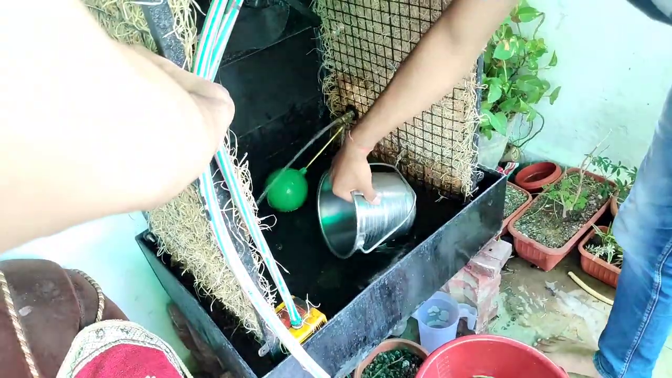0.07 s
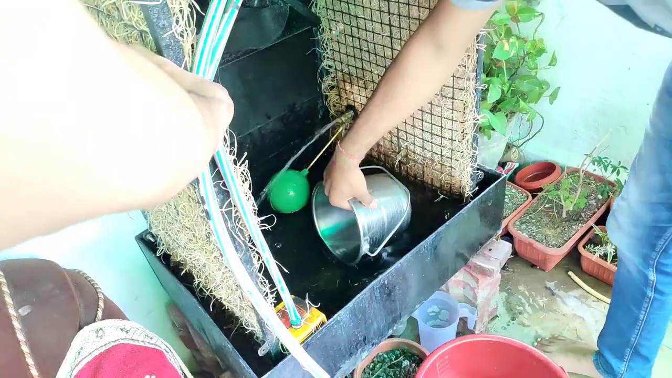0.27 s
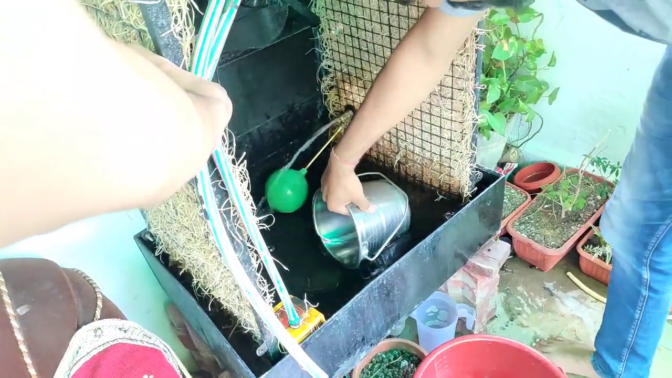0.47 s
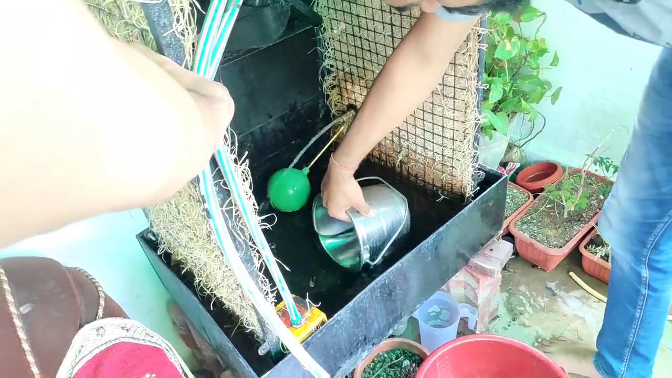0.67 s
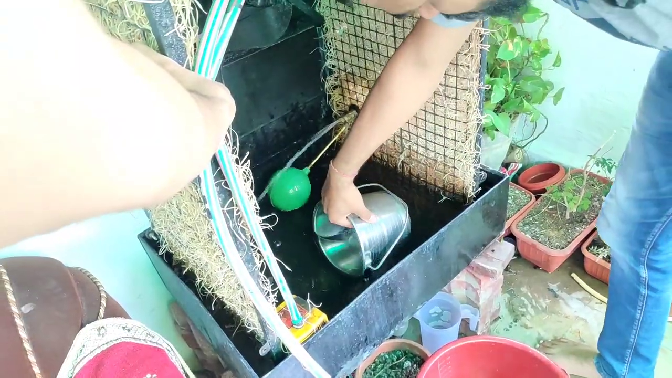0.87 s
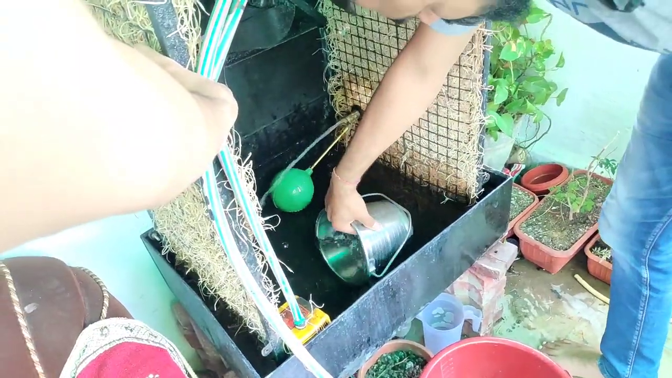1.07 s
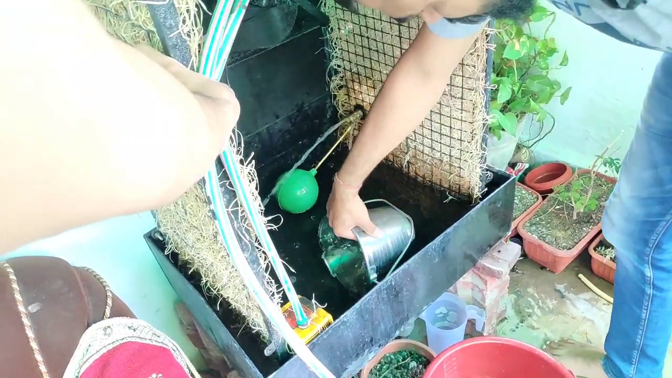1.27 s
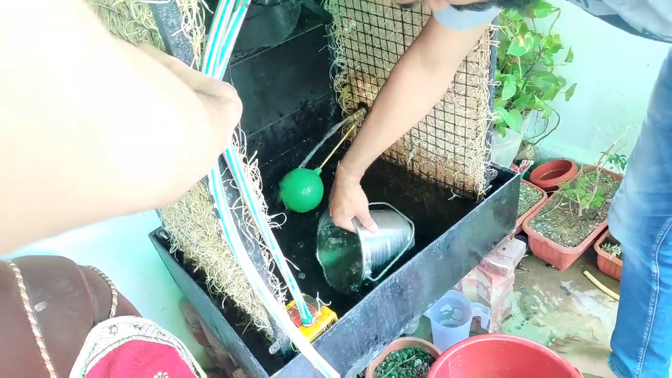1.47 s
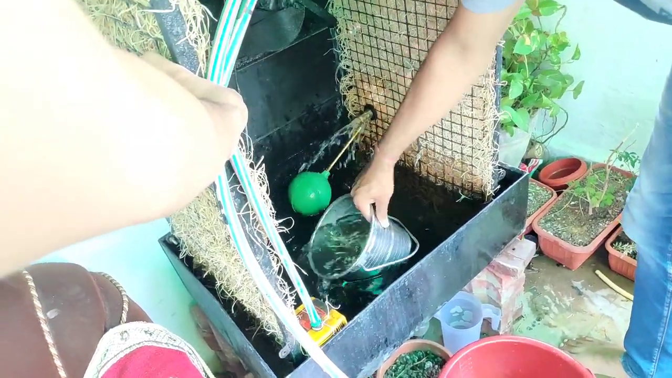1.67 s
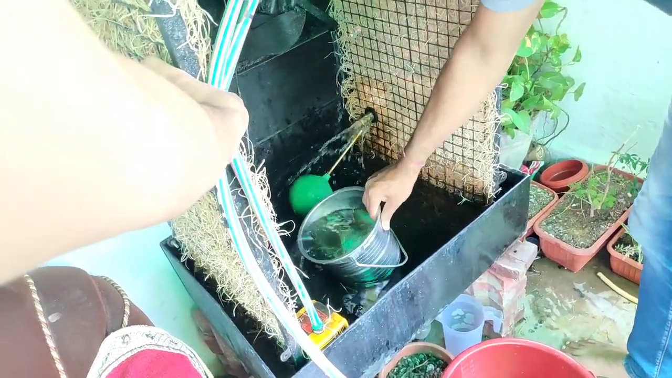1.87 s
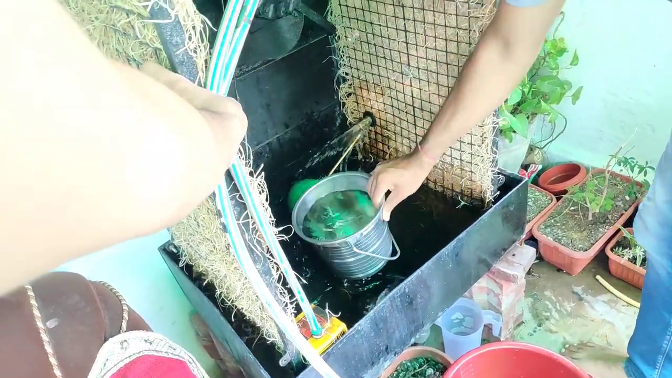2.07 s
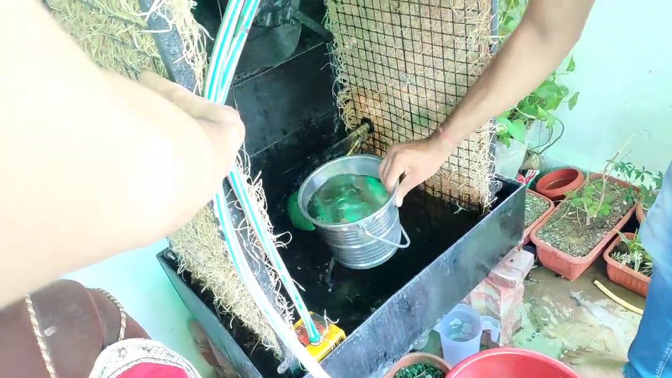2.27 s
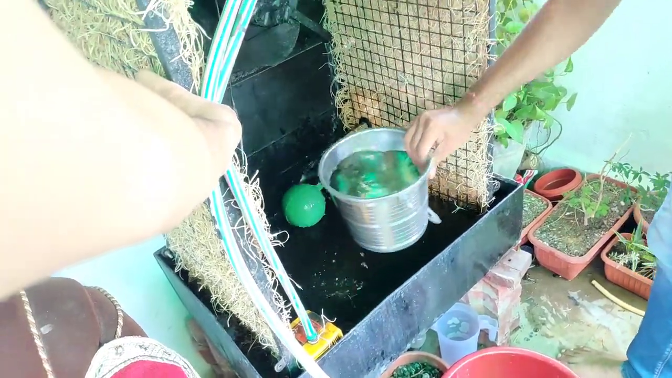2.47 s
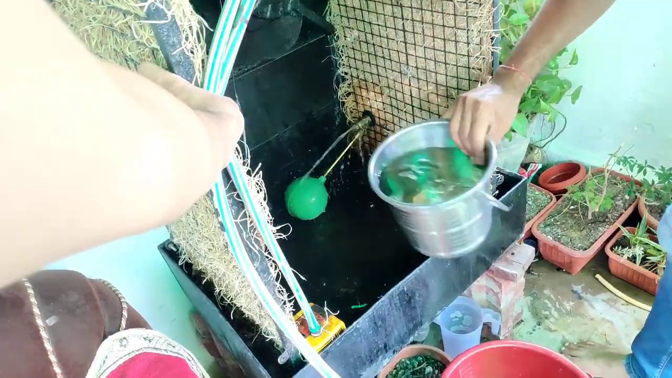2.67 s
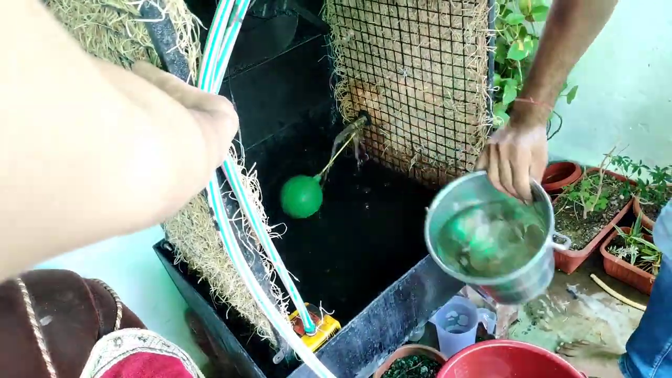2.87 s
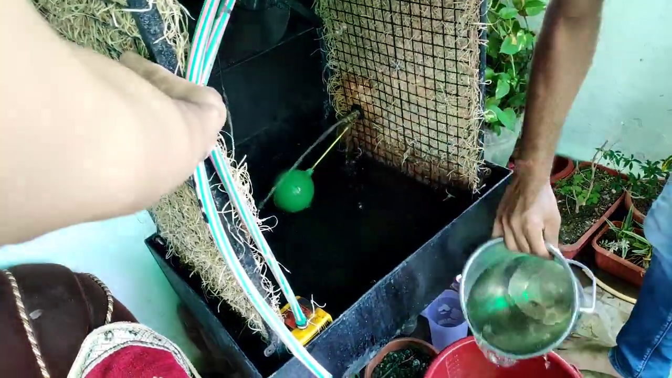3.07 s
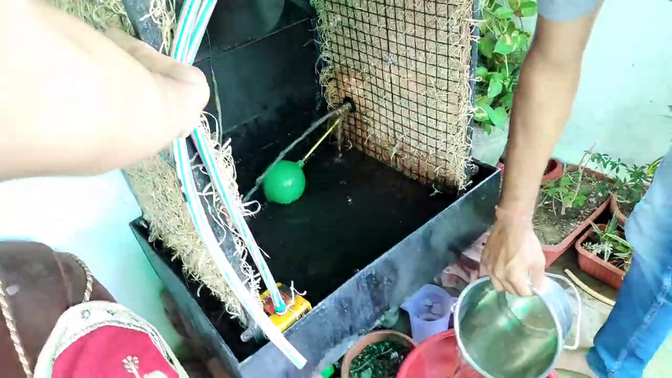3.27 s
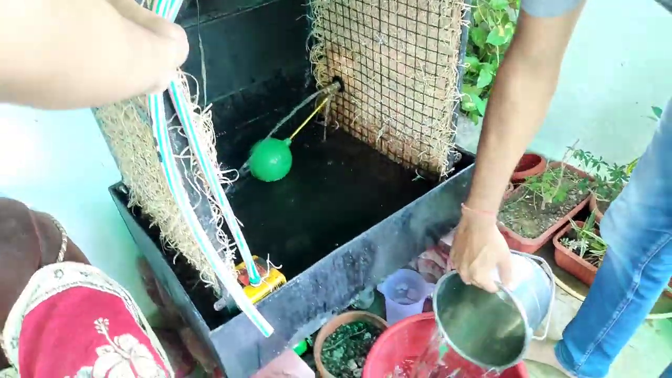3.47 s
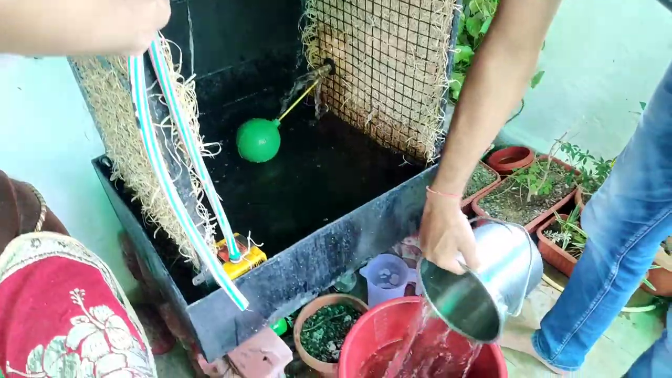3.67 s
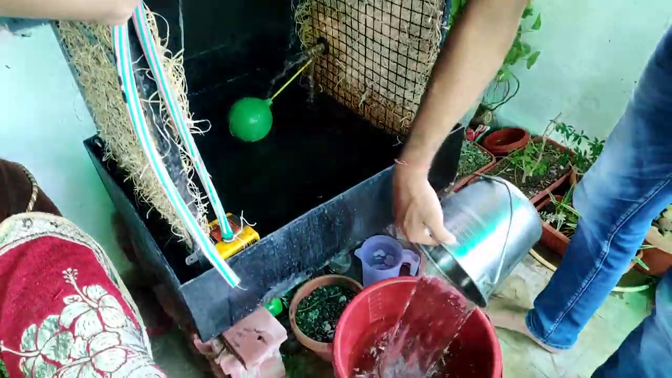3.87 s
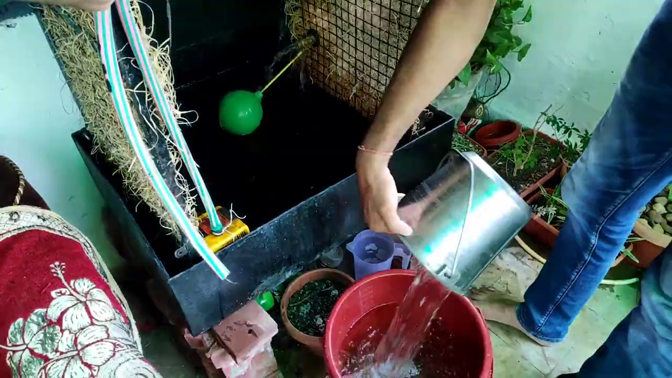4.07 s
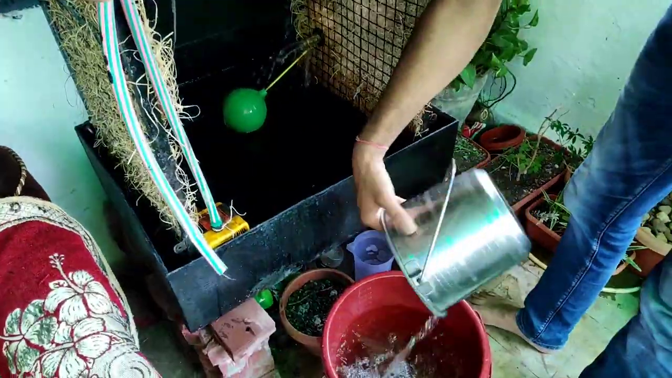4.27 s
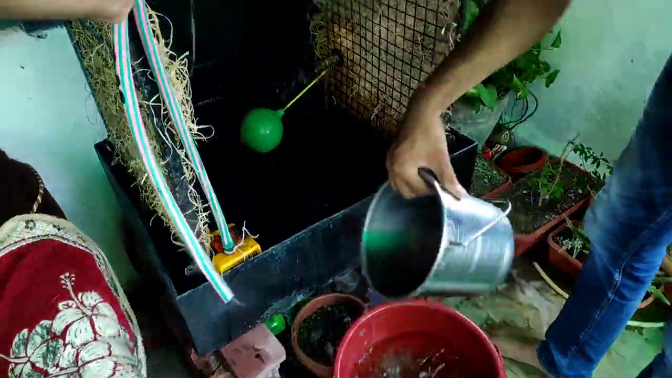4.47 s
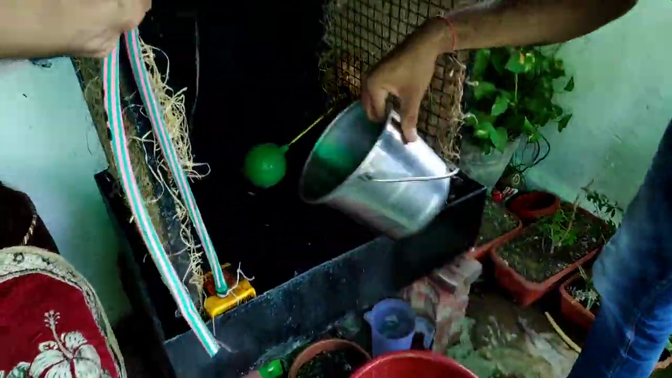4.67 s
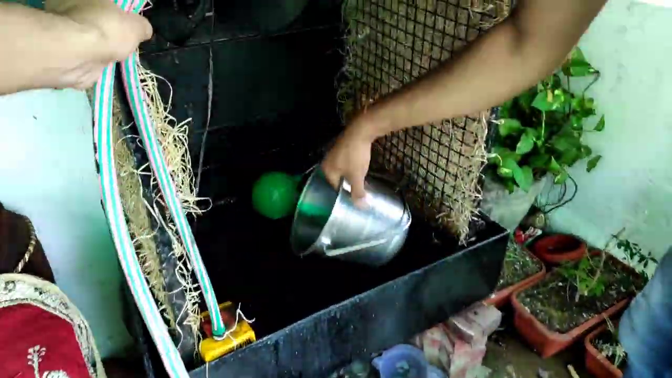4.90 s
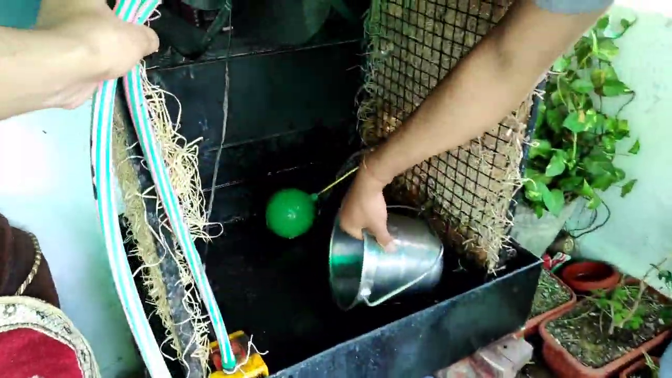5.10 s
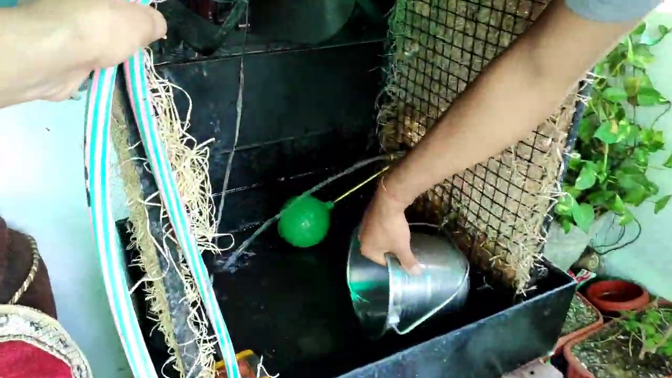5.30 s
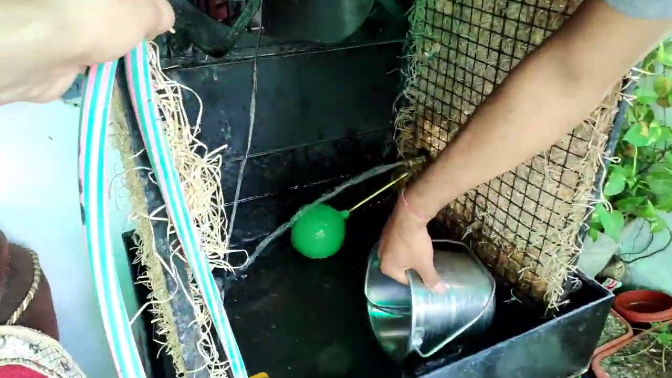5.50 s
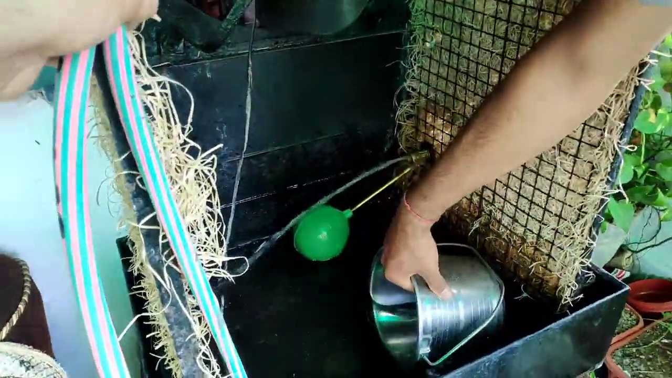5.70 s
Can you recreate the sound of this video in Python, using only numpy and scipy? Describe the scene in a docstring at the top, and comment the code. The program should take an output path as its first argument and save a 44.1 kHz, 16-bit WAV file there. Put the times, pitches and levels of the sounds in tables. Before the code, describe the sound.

A metal bucket scoops gurgling water from a tank, pours it splashing into a plastic tub, then knocks loudly with a ringing clang.

```python
"""A steel bucket is dipped into a water tank, fills, drips and is poured into a plastic tub; emptied,
it knocks and rings on its way back. Plops, drops and gurgles are ringing air bubbles; the pour is a
resonant rush full of bubbles; the steel is a sum of decaying modes; spray and trickle are shaped noise.
Water trickles in the tank all along, and its walls return short reflections.
A phone microphone with a noise suppressor listens from nearby and overloads on the knocks."""
import sys
import numpy as np
from scipy import signal
from scipy.io import wavfile
from scipy.ndimage import uniform_filter1d

SR = 44100
rng = np.random.default_rng(int(sys.argv[2]) if len(sys.argv) > 2 else 0)


def dump_mix(stems):
    """Bounce the given channels to the path in sys.argv[1] as a 16-bit WAV at rate SR."""
    frames = np.atleast_2d(stems).T  # one column per channel
    limited = np.clip(frames, -1, 1)  # hard clip at full scale
    pcm = np.round(limited * 32767).astype(np.int16)
    wavfile.write(sys.argv[1], SR, pcm)


N = 253134  # samples


def amp(db):
    """Amplitude factor of a level in dB."""
    return np.exp(np.asarray(db) * (np.log(10) / 20))


def evened(x):
    """The signal scaled to rms 1."""
    return x / np.sqrt(np.mean(x ** 2) + 1e-20)


def add(mix, s, sound):
    """Mixes in a sound from second s, trimmed at both ends of the scene."""
    start = round(s * SR)
    sound = sound[max(-start, 0):]
    part = mix[max(start, 0):][:len(sound)]
    part += sound[:len(part)]


def curve(table, column):
    """One column of a table, interpolated over t/s at every sample."""
    rows = np.transpose(table)
    return np.interp(np.arange(N) / SR, rows[0], rows[column])


def hiss(spectrum, patchy_db=0., flicker_db=0.):
    """Noise from random short-time spectra with drifting patches and wide-band flicker, rms 1."""
    frames, hz = N // 128 + 5, np.fft.rfftfreq(512, 1 / SR)
    real, imaginary, patches = rng.standard_normal((frames, 257, 3)).T
    patches = uniform_filter1d(patches, 6, 0)  # across frequency
    patches = evened(uniform_filter1d(patches, 12, 1))  # across time
    f, db = np.transpose(spectrum)
    colour_db = np.interp(np.log(hz + 1), np.log(f + 1), db)[:, None]
    flicker = flicker_db * rng.standard_normal(frames)
    z = (real + 1j * imaginary) * amp(colour_db + patchy_db * patches + flicker)
    return evened(signal.istft(z, nperseg=512, noverlap=384)[1][:N])


def resonate(x, hz, width):
    """Resonance along the curve hz: shifts it to zero, smooths twice, shifts back; rms 1."""
    turn = np.exp(2j * np.pi * np.cumsum(hz) / SR)
    r = np.exp(-np.pi * width / SR)
    smooth = signal.lfilter([1], [1, -2 * r, r * r], x / turn)
    return evened((turn * smooth).real)


def bubble(hz, t60, rise=0.22, onset_s=.002):
    """A ringing pocket of air; its pitch climbs as it nears the surface."""
    t = np.arange(round(t60 * SR)) / SR
    turns = hz * (t + rise * t ** 2 / t60)
    return (1 - np.exp(-t / onset_s)) * amp(-60 * t / t60) * np.sin(2 * np.pi * turns)


def swarm(hz, per_s, octaves, cycles, spread_db):
    """Many bubbles at random moments, a few much louder, scattered about the pitch curve hz; rms 1."""
    out, n = np.zeros(len(hz)), len(hz)
    for when, tune, big in rng.random((round(per_s * n / SR), 3)):
        pitch = hz[int(when * n)] * 2 ** (octaves * (tune - .5))
        one = bubble(pitch, cycles / pitch, rise=0.061, onset_s=1 / pitch)
        add(out, when * n / SR, amp(-spread_db * np.log(big + 0.015)) * one)
    return evened(out)


# Large bubbles and plops at the bucket: (t/s, level/dB, starting f/Hz, t60/s)
PLOPS = [(0.027, -23.5, 453, 0.033), (0.203, -33, 887, 0.054), (0.264, -31, 770, 0.039),
         (0.355, -33, 2060, 0.048), (0.442, -28, 820, 0.039), (0.547, -29, 977, 0.069),
         (0.631, -35.5, 938, 0.073), (0.693, -28, 818, 0.1), (0.924, -32, 823, 0.089),
         (1.019, -29, 438.2, 0.41), (1.042, -27, 428, 0.041), (1.085, -27.5, 460, 0.067),
         (1.129, -22.5, 412, 0.066), (1.16, -24, 402, 0.1), (1.18, -32, 850, 0.054),
         (1.236, -19, 831, 0.047), (1.294, -40, 867, 0.068), (1.32, -31, 454, 0.12),
         (1.507, -34, 880, 0.029), (1.522, -20, 550, 0.021), (1.581, -30, 810, 0.072),
         (1.613, -18.5, 755, 0.022), (1.637, -25.5, 688, 0.029), (1.66, -22.5, 812, 0.05),
         (1.691, -24.5, 785, 0.053), (1.743, -20.5, 845, 0.044), (1.871, -25.5, 1610, 0.015),
         (1.893, -23, 1103, 0.026), (1.972, -22.5, 775, 0.058), (2.054, -24, 740, 0.027),
         (2.1, -19, 1180, 0.018), (2.185, -23, 1145, 0.023), (2.254, -30, 1264, 0.044),
         (2.564, -15, 716, 0.022), (2.646, -26, 893, 0.069), (2.824, -29, 817, 0.033),
         (2.96, -41.5, 993, 0.21), (3.045, -42.5, 723, 0.14), (3.263, -24, 1507, 0.057),
         (3.413, -18, 870, 0.046), (3.469, -18, 1013, 0.3), (3.47, -9, 425, 0.038), (3.472, -33, 664, 0.08),
         (3.531, -14.5, 910, 0.076), (3.595, -8.5, 409, 0.037), (3.62, -17.5, 718, 0.075),
         (3.63, -13.5, 989, 0.09), (3.64, -17, 405, 0.07), (3.725, -19, 988, 0.13),
         (3.767, -26.5, 404, 0.24), (3.89, -20, 437, 0.092), (3.935, -25, 714, 0.23),
         (3.99, -22.5, 395, 0.15), (4.124, -18.5, 445, 0.052), (4.302, -14.5, 470, 0.022),
         (4.36, -30, 470, 0.28), (4.477, -20, 617, 0.039), (4.513, -19, 788, 0.063),
         (4.924, -32, 445, 0.15), (5.217, -25, 674, 0.049), (5.588, -24, 535, 0.036),
         (5.693, -33, 594, 0.18)]


def plops():
    """Large air pockets rung one by one."""
    out = np.zeros(N)
    for s, db, hz, t60 in PLOPS:
        add(out, s, amp(db) * bubble(hz, t60, rise=0.077, onset_s=0.003))
    return out


# Slugs of water landing in the tub: (t/s, stream level/dB)
SURGES = [(3.41, -39), (3.467, -24.5), (3.592, -34), (3.618, -27), (4.124, -48), (4.294, -36), (4.515, -34)]
SURGE_RISE_S, SURGE_FADE_DB_PER_S = 0.0018, 308
POUR_FROM_S, POUR_TO_S, POUR_DB = 3.41, 4.55, -29
THINNING_DB_PER_S = 10  # the stream thins as the bucket empties


def flow():
    """Strength of the poured stream: a thinning flow with sudden surges."""
    t, since = np.arange(N) / SR, np.arange(SR // 4) / SR
    pouring = (t > POUR_FROM_S) * (t < POUR_TO_S)
    out = amp(POUR_DB - THINNING_DB_PER_S * (t - POUR_FROM_S)) * pouring
    for s, db in SURGES:
        rise = np.minimum(since / SURGE_RISE_S, 1)
        add(out, s, rise * amp(db - SURGE_FADE_DB_PER_S * since))
    return out


# Spectrum of the rush with the plastic tub's resonances: (f/Hz, level per Hz/dB)
TUB_RUSH = [(59, -66), (100, -50), (134, -42), (333, -5), (447, -0.5), (521, -6), (1030, -3), (1610, -12.5),
            (2370, -18.5), (2850, -26.5), (4000, -19.5), (5200, -74), (8800, -120)]


def pour(stream):
    """A dense rush that starts when the stream lands in the tub, full of bubbles."""
    froth, flat = np.zeros(N), np.ones(round(1.2 * SR))
    low_bubbles = amp(-6.5) * swarm(860 * flat, 150, 0.91, 40, 3.4)
    high_bubbles = amp(-12) * swarm(1580 * flat, 120, .64, 38, 3.2)
    add(froth, POUR_FROM_S, low_bubbles + high_bubbles)
    return stream * (hiss(TUB_RUSH, 0.79, 2.2) + froth)


# Contacts of the empty bucket, the first before the start:
# (t/s, crack level/dB, crack t60/s, boom level/dB, boom t60/s, wall level/dB, t/s when water damps the wall)
KNOCKS = [(-.6, -70, .1, -65, .1, -11, 0.12), (4.5614, -5.5, 0.15, 3.5, 0.98, -53.5, 6.4),
          (4.5686, -33, 0.038, 6, 0.16, -30, 3.4), (4.6045, -12.5, 0.14, 12.5, 0.059, -16.5, 5.22)]
# The bucket's base and the air in it: (f/Hz, relative level/dB)
BASE_MODES = [(479, 0), (452, -16)]
# The steel wall: (f/Hz, relative level/dB, t60/s)
WALL_MODES = [(754, -21, 3.0), (781, -22, 2.0), (1200, -7, .62), (1389, -15, 1.8), (1395.4, -16.5, 1.8),
              (1951, -19, .7), (2923, -14, .42), (1396, 7, .1), (1492, 4, .1), (2094, -3, .1),
              (2618, -1, .1), (3774, -16, .25), (4091, -12, .4), (4385, 0, .1), (4947, -24, .5),
              (5319, -6, .12), (7069, -4, .12), (8020, -10, .15), (9211, -10, .15)]
# Spectrum of the contact noise: (f/Hz, level per Hz/dB)
CRACK_SPECTRUM = [(350, -16), (600, -1.5), (1030, -12), (1420, -9.5), (2310, -16), (2540, -4.5), (7150, -9),
                  (10300, -7), (15000, -25.5)]


def knocks():
    """A crack, the boom of the base, and the wall's modes; a new contact chokes the boom before it."""
    out, t, crackle = np.zeros(N), np.arange(SR) / SR, hiss(CRACK_SPECTRUM, 3., 2.5)
    until = [row[0] for row in KNOCKS[1:]] + [N / SR]
    for knock, end in zip(KNOCKS, until):
        s, crack_db, crack_t60, boom_db, boom_t60, ring_db, wet_s = knock
        boom = sum(amp(db) * np.sin(2 * np.pi * hz * (t + s)) for hz, db in BASE_MODES)
        swell = (1 - np.exp(-t / 0.0045)) ** 2 * amp(boom_db - 60 * t / boom_t60)
        choke = np.exp(-np.maximum(t + s - end, 0) / 0.0036)
        wall = np.zeros(SR)
        for k, (hz, db, t60) in enumerate(WALL_MODES):
            phase_sign = (-1) ** k  # neighbouring modes start in opposite phase
            wall += phase_sign * amp(db - 60 * t / t60) * np.sin(2 * np.pi * hz * t)
        wall *= np.exp(-np.maximum(t + s - wet_s, 0) / 0.05)
        crack = amp(crack_db - 60 * t / crack_t60) * crackle[round(abs(s) * SR):][:SR]
        add(out, s, boom * swell * choke + amp(ring_db) * wall + crack)
    return out


# Drops and splash ticks: (t/s, level/dB, strongest f/Hz, crack level relative to the drop/dB)
DROPS = [(0.0802, -20.5, 4960, -8), (0.1185, -20, 4570, -12), (0.1415, -19, 5200, -14),
         (0.2029, -31.5, 1940, 6.5), (0.2393, -12.5, 4510, -7), (0.2754, -26, 4240, -6),
         (0.3066, -21, 4560, -19.5), (0.3451, -28.5, 2330, 3), (0.388, -24.5, 6450, -11.5),
         (0.4557, -18, 8500, -24), (0.4727, -19, 4900, -6.5), (0.4998, -18.5, 9400, -10.5),
         (0.5234, -28.5, 2420, 4.5), (0.5442, -26.5, 4200, 2), (0.6025, -23.5, 4900, -4.5),
         (0.668, -30, 4300, -12.5), (0.8001, -30, 4120, -7.5), (0.8135, -32.5, 3140, 8.5),
         (0.947, -18.5, 8300, -20), (1.0348, -31, 3970, 2), (1.1515, -20.5, 4480, -4),
         (1.1967, -23, 6260, -9), (1.232, -23.5, 4800, -4), (1.2918, -19, 5660, -8),
         (1.3869, -33, 2210, 9.5), (1.4057, -18, 5700, -2.5), (1.421, -21.5, 4600, -6),
         (1.469, -20, 4470, -2.5), (1.5262, -35.5, 4700, 10), (1.558, -38.5, 3140, 15),
         (1.588, -28, 5240, -1), (1.6135, -19.5, 4660, -26), (2.176, -21, 7000, -9),
         (2.2083, -34.5, 2640, 10), (2.2268, -35, 2180, 8), (2.337, -23.5, 6200, -8),
         (2.7122, -33, 4100, 4), (2.7923, -32.5, 3660, 5.5), (2.9716, -20, 8940, -22),
         (3.1218, -24, 5040, -4), (3.2344, -18, 9600, -20), (3.3278, -32, 7510, -15),
         (3.3753, -18, 6000, -22), (3.58, -24, 2330, 2), (3.6277, -20, 3380, -4), (3.8447, -25, 2380, -2),
         (3.894, -24.5, 2180, -17), (3.922, -6, 11000, -10.5), (4.0237, -18, 1965, -21),
         (4.0512, -22, 2450, -6), (4.2162, -10, 12800, -10), (4.223, -24.5, 3700, -7),
         (4.2946, -27, 2100, -9.5), (4.3879, -19, 7050, -13), (4.437, -19, 5900, -12),
         (4.4722, -16, 6770, -11), (4.517, -21.5, 6550, -5), (4.5321, -28, 2260, 9),
         (4.8315, -6, 9200, -20), (4.892, -22.5, 6280, -9), (4.9453, -28, 1800, -5), (5.04, -34, 3300, 1),
         (5.1928, -22.5, 4500, -3), (5.2546, -24, 6280, -10), (5.2715, -31, 3510, 6),
         (5.3266, -19, 6200, -25.5), (5.3444, -22, 4740, -0.5), (5.4493, -26.5, 5760, -1.5),
         (5.5509, -36, 1770, 17), (5.6339, -20, 2384, -3.5), (5.6696, -23, 5030, -27),
         (5.6987, -20.5, 4240, -16)]
DROP_T60_S = 0.031  # of the crack, and the longest for a bubble


def drops():
    """Each drop cracks the surface and leaves a small bubble; the tiniest bubbles die soonest."""
    out, crackle = np.zeros(N), rng.standard_normal(N)
    t = np.arange(round(DROP_T60_S * SR)) / SR
    for s, db, hz, crack_db in DROPS:
        t60 = min(DROP_T60_S, 0.012 * (4500 / hz) ** 2)
        add(out, s, amp(db - 3) * bubble(hz, t60, rise=0.063, onset_s=0.000095))
        band = signal.butter(1, [hz / 1.5, min(hz * 2, 18000)], "band", fs=SR)
        crack = signal.lfilter(*band, crackle[round(s * SR):][:len(t)])
        add(out, s, amp(db + crack_db - 60 * t / DROP_T60_S) * crack)
    return out


# Laps of water, each a burst of small bubbles: (t/s, hold/s, level/dB, starting f/Hz)
LAPS = [(0.0, 0.097, -44.5, 788), (0.065, .06, -42, 594), (0.04, 0.018, -41.5, 1626), (0.2, 0.1, -45, 757),
        (0.34, 0.16, -51, 1830), (0.44, 0.082, -55.5, 870), (0.512, 0.35, -57.5, 930),
        (0.455, 0.05, -55, 1920), (0.704, .07, -46.5, 695), (0.799, .07, -49.5, 688),
        (0.77, 0.086, -52.5, 1526), (0.92, 0.14, -52, 796), (0.92, .17, -53.5, 1264), (1.1, 0.23, -46, 900),
        (1.109, 0.11, -48, 1540), (1.247, 0.2, -47.5, 1925), (1.5, 0.041, -47, 797),
        (1.5, 0.021, -45, 1530), (1.58, 0.18, -45.5, 775), (1.87, 0.16, -44.5, 1360),
        (1.912, 0.068, -51.5, 700), (1.972, 0.14, -42.5, 783), (2.08, 0.18, -47, 1186),
        (2.25, 0.05, -51, 808), (2.33, 0.013, -50.5, 1670), (2.475, 0.052, -46, 880),
        (2.475, 0.018, -44.5, 1504), (2.55, 0.12, -42.5, 855), (2.64, 0.019, -53, 1560),
        (2.82, .06, -52.5, 820), (2.902, .12, -53, 935), (3.03, 0.11, -55.5, 822),
        (3.09, 0.048, -51.5, 1780), (3.25, 0.04, -40.5, 1707), (3.29, 0.021, -41, 644),
        (4.84, 0.019, -43, 1890), (4.854, 0.15, -45.5, 916), (5.023, 0.174, -48.5, 740),
        (5.1, 0.041, -46.5, 1560), (5.196, 0.15, -55.5, 1194), (5.2, 0.071, -45.5, 722),
        (5.39, 0.02, -48.5, 900), (5.545, .05, -48, 1690), (5.545, 0.066, -45, 572),
        (5.549, 0.16, -52.5, 958), (5.587, .03, -45.5, 3020), (5.629, .04, -41, 2316),
        (5.666, .05, -47, 1710), (5.69, .06, -37, 618), (5.684, .06, -36.5, 906)]
LAP_RISE_S, LAP_FADE_DB_PER_S, LAP_LONGEST_S = .004, 261, .36
LAP_CLIMB = 0.17  # share by which the pitch climbs in a second


def laps():
    """Each lap starts at once, gurgles on about one pitch, then fades."""
    out, t = np.zeros(N), np.arange(round(LAP_LONGEST_S * SR)) / SR
    for s, hold, db, hz in LAPS:
        pitch = hz * (1 + LAP_CLIMB * t)
        churn = resonate(rng.standard_normal(len(t)), pitch, 0.42 * hz)
        gurgle = swarm(pitch, 90, 0.35, 44, 3.0) + amp(-4) * churn
        fade = amp(db - LAP_FADE_DB_PER_S * np.maximum(t - hold, 0))
        add(out, s, np.minimum(t / LAP_RISE_S, 1) * fade * evened(gurgle))
    return out


# Water stirring in tank and bucket: (t/s, hollow slosh level/dB before the pour adds to it, spray level/dB)
STIR = [(0.0, -36, -40), (0.12, -48.5, -44), (0.2, -50.5, -40), (0.55, -51, -41.5), (0.75, -78, -40.5),
        (0.97, -50, -44), (1.05, -40.5, -39), (1.22, -41, -40.5), (1.4, -50, -40), (1.6, -66, -46),
        (1.75, -57, -47.5), (2.06, -57, -39), (2.2, -66, -46.5), (2.26, -54.5, -44.5), (2.5, -58, -47.5),
        (2.82, -56.5, -48), (3.0, -77, -46), (3.14, -52, -51), (3.22, -57, -41.5), (3.3, -58, -39),
        (3.5, -54, -35), (4.5, -49, -40.5), (4.7, -31, -41.5), (4.85, -53.5, -52), (5.25, -52, -40),
        (5.48, -59, -46.5), (5.6, -61, -38.5), (5.74, -60, -45)]


def slosh(stream):
    """Slosh in the hollow bucket: bubbles over churning noise near one pitch, stronger with the pour."""
    flat = np.ones(N)
    churn = resonate(rng.standard_normal(N), 445 * flat, 80)
    sound = swarm(440 * flat, 90, .4, 36, 3.5) + amp(-3) * churn
    return evened(sound) * (amp(curve(STIR, column=1)) + amp(-9.5) * stream)


# Spectrum of the spray noise: (f/Hz, level per Hz/dB)
SPRAY_SPECTRUM = [(1650, -34), (2800, -11), (4480, -5), (6190, -7), (8140, -3), (10600, -10.5),
                  (13000, -12.5), (14500, -19), (15000, -42)]


def spray():
    """Fine fizz of tiny bubbles over flickering noise, following the stirring."""
    fizz = amp(-6) * swarm(4800 * np.ones(N), 240, 1.3, 14, 4.5) + hiss(SPRAY_SPECTRUM, 1.5, 2.5)
    return evened(fizz) * amp(curve(STIR, column=2))


# Light lapping in the tank: (t/s, level/dB)
LAPPING = [(0.0, -46), (0.4, -50.5), (0.91, -54), (1.07, -48.5), (1.23, -46), (1.39, -50.5), (1.63, -61.5),
           (1.89, -53), (2.08, -45.5), (2.65, -66), (3.09, -66), (3.34, -50), (3.52, -44), (3.63, -44.5),
           (3.87, -46.5), (4.2, -47.5), (4.59, -47), (4.86, -52), (5.55, -58), (5.74, -44.5)]


def lapping():
    """Light lapping: small bubbles over a broad resonance of churning noise."""
    flat = np.ones(N)
    churn = resonate(rng.standard_normal(N), 2500 * flat, 790)
    sound = swarm(2500 * flat, 170, .75, 40, 3.3) + amp(-2.5) * churn
    return evened(sound) * amp(curve(LAPPING, column=1))


# Low wash of moving water: (t/s, level/dB before the pour adds to it)
WASH = [(0.0, -53), (0.14, -65), (1.04, -67), (1.28, -56), (1.58, -52), (1.8, -64.5), (3.01, -65),
        (3.47, -51), (3.6, -80), (3.9, -51.5), (4.64, -76), (4.8, -75), (5.16, -82), (5.74, -55)]


def wash(stream):
    """Low patchy noise of moving water, stronger with the pour."""
    low = hiss([(40, -27.5), (100, -35.5), (180, 9.5), (290, 7.5), (400, -25.5)], 3.9, 0.8)
    return low * (amp(curve(WASH, column=1)) + amp(-22.5) * stream)


DRAIN_FROM_S, DRAIN_TO_S, DRAIN_DB, DRAIN_HZ = 1.48, 3, -46, 6300


def drain():
    """Water sheeting off the rising bucket: a fine hiss that swells and fades."""
    u = np.clip((np.arange(N) / SR - DRAIN_FROM_S) / (DRAIN_TO_S - DRAIN_FROM_S), 0, 1)
    colour = [(DRAIN_HZ * .7, -30), (DRAIN_HZ * .88, -2), (DRAIN_HZ * 1.08, 0),
              (DRAIN_HZ * 1.3, -25), (16000, -50)]
    return amp(DRAIN_DB) * np.sin(np.pi * u) ** .5 * hiss(colour, 3., 2.)


# Faint high tinkles while the full bucket is lifted: (t/s, level/dB)
TINKLES = [(2.602, -56), (2.809, -61.5), (2.99, -74)]
# Tones of each tinkle: (f/Hz, relative level/dB)
TINKLE_TONES = [(8511, 11.5), (11122, 7), (11978, 8), (14093, -2.5)]


def tinkle():
    """Thin decaying steel tones, barely heard."""
    out, t = np.zeros(N), np.arange(SR // 5) / SR
    tones = sum(amp(db - 60 * t / 0.29) * np.sin(2 * np.pi * hz * t) for hz, db in TINKLE_TONES)
    for s, db in TINKLES:
        add(out, s, amp(db) * tones)
    return out


# Spectrum of the trickle in the tank: (f/Hz, level per Hz/dB)
TRICKLE_SPECTRUM = [(18, -58), (30, -22), (92, -34), (176, -9.5), (437, -19.5), (581, -8), (881, 1),
                    (1240, -12), (1730, -12), (2250, 2.5), (3070, -19.5), (6880, 0), (13900, -16),
                    (15000, -41)]


def trickle():
    """Steady background trickle: patchy, flickering noise."""
    return amp(-47) * hiss(TRICKLE_SPECTRUM, 3.7, 4.2)


def reflections(x):
    """Short reflections off the tank walls: sparse taps of random sign dying away."""
    taps, at = np.zeros(SR // 4), np.arange(120, SR // 4 - 20, 20)
    signs = rng.choice([-1., 1.], len(at))
    taps[at + rng.integers(0, 20, len(at))] = signs * amp(-60 * at / SR / 0.09)  # t60 0.09 s
    return signal.fftconvolve(x, taps / np.linalg.norm(taps))[:N]


def scene():
    """Bucket and water together; only plops, drops and tinkles get the reflections."""
    stream = flow()
    near = plops() + drops() + tinkle()
    moving = pour(stream) + laps() + slosh(stream) + spray() + lapping() + wash(stream) + drain()
    return (near + knocks() + amp(-4.5) * reflections(near) + moving + trickle())[None]


EDGE_HZ = 14500  # upper band limit


def record(dry):
    """Phone microphone: bass cut, suppressor lowering bands near their quiet level, overload, band limit."""
    x = signal.sosfilt(signal.butter(3, 140, "high", fs=SR, output="sos"), dry[0])
    hz, _, z = signal.stft(x, SR, nperseg=512, noverlap=384)
    power = uniform_filter1d(uniform_filter1d(abs(z) ** 2, 3, 0), 4, 1)
    power_db = 10 * np.log10(abs(power) + 1e-14)
    over_db = power_db - np.percentile(power_db, 25, axis=1, keepdims=True)
    # deepest near 600 Hz
    depth_db = np.interp(hz, [300, 600, 3000, 5000], [0.8, 28, 6.6, 2.9])[:, None]
    fall = np.arange(z.shape[1]) * 128 / SR * 47.0  # opens at once, closes by this many dB a second
    open_db = np.clip(1.8 * (over_db - 10), -depth_db, 0)
    gate_db = np.maximum.accumulate(open_db + fall, axis=1) - fall
    x = signal.istft(z * amp(gate_db), nperseg=512, noverlap=384)[1][:N]
    x = np.clip(x, -.97, .97)  # overload
    band_limit = signal.firwin(511, EDGE_HZ, window=("kaiser", 9), fs=SR)
    return signal.oaconvolve(x, band_limit, "same")[None]


dry = scene()
out = record(dry)
dump_mix(out)
```